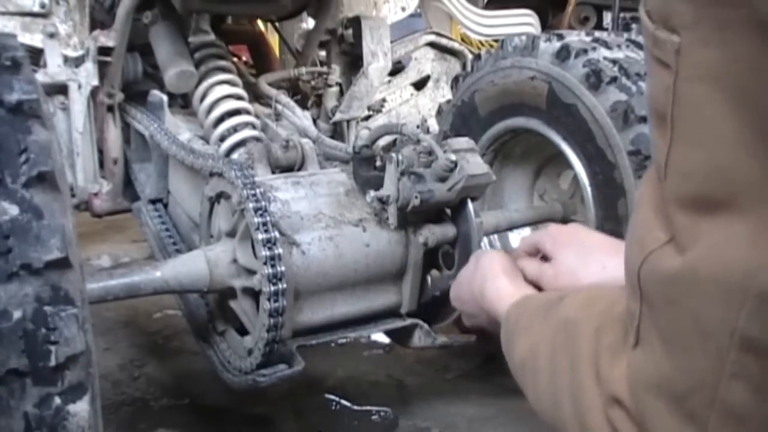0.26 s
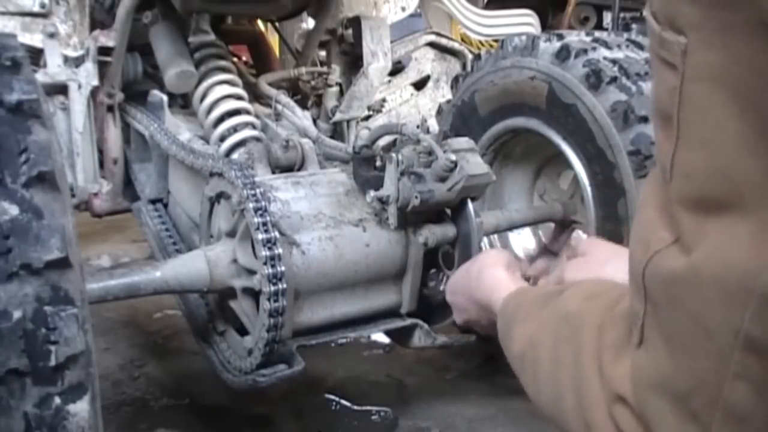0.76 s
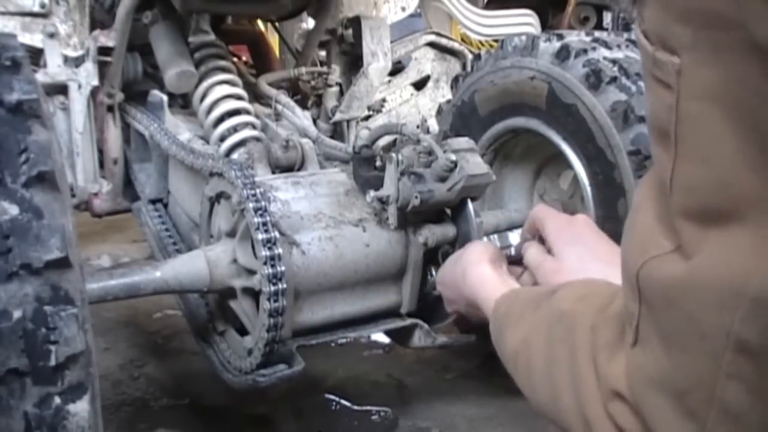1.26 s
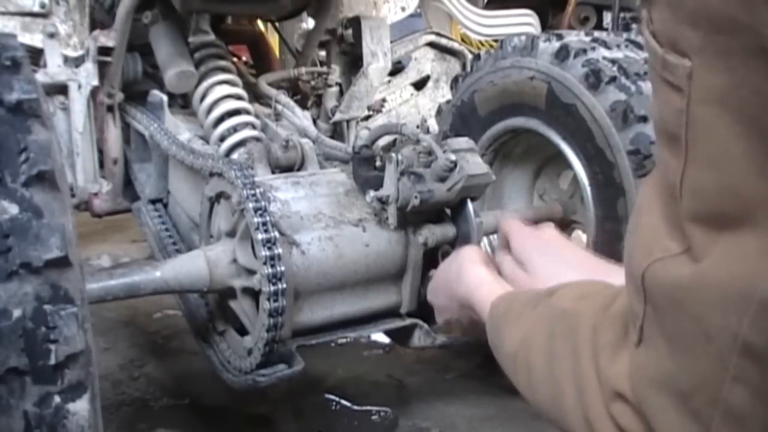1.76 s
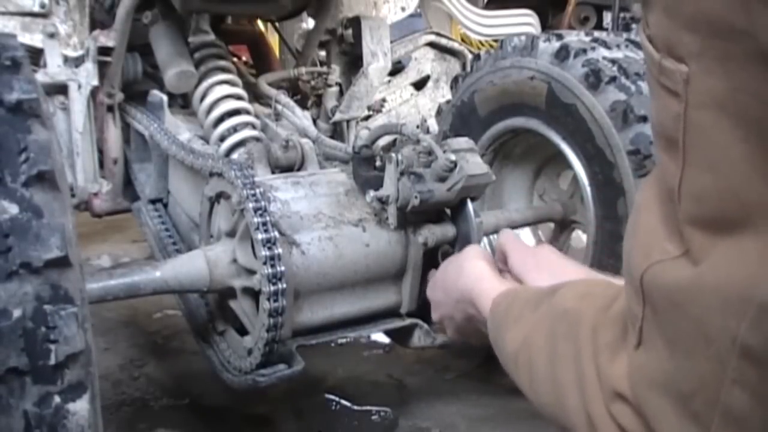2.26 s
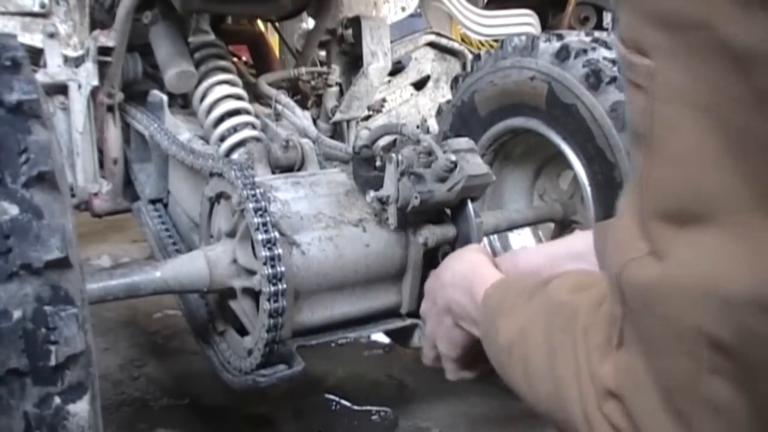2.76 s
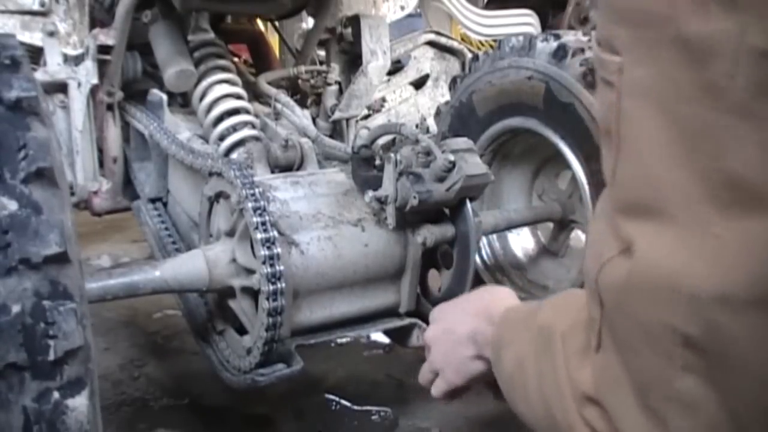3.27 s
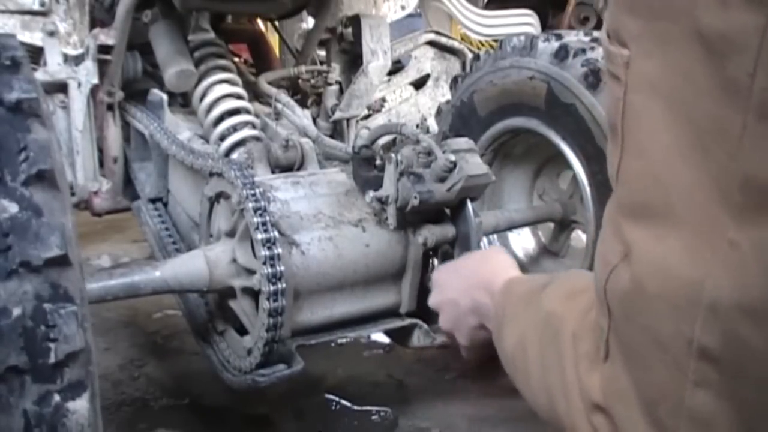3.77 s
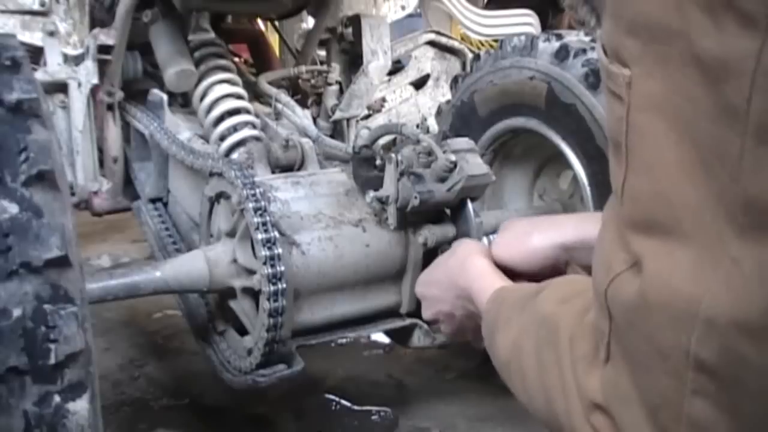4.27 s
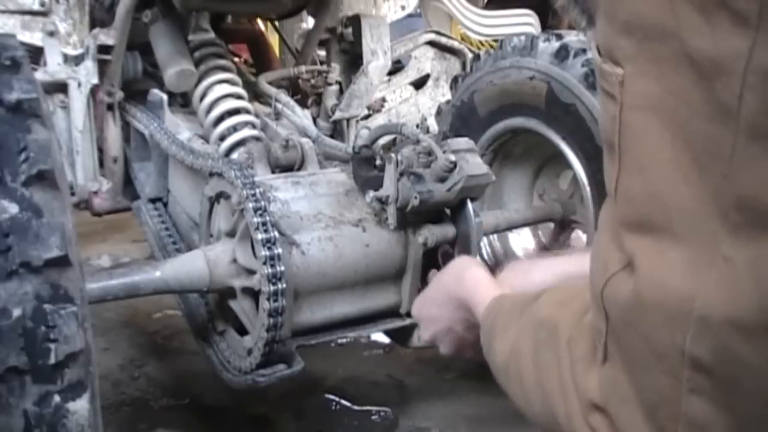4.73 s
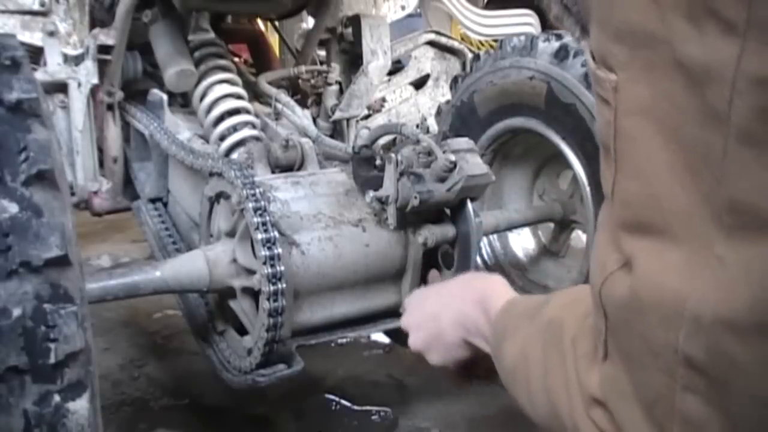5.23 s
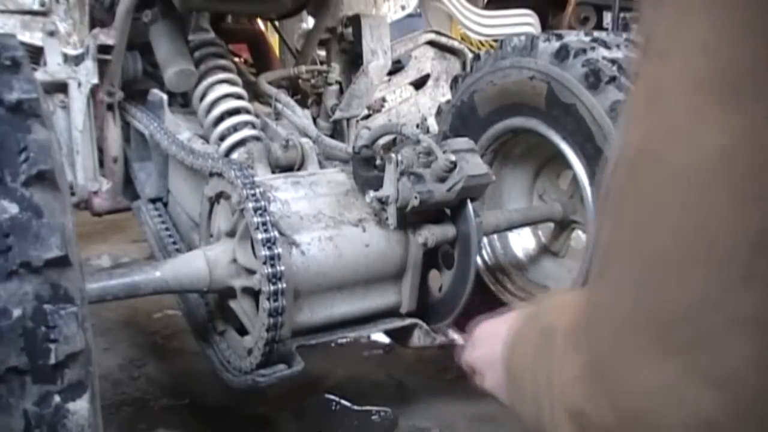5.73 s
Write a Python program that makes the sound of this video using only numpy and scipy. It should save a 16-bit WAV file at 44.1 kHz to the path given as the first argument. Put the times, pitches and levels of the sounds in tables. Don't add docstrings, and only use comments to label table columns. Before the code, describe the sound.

Hands unscrew a bolt: sharp knocks, quick clicks, small jingles and two parts set down with a clank, over cloth rustle and faint hiss.

```python
import sys
import numpy as np
from scipy import signal
from scipy.fft import rfft, irfft
from scipy.io import wavfile
from scipy.ndimage import uniform_filter1d

SR = 44100
rng = np.random.default_rng(int(sys.argv[2]) if len(sys.argv) > 2 else 0)


def field_ratio(decibels):
    return 10 ** (np.asarray(decibels, dtype=float) / 20)


def generate_wav(sig):
    pcm = np.round(np.clip(np.atleast_2d(sig).T, -1, 1) * 32767).astype(np.int16)
    wavfile.write(sys.argv[1], SR, pcm)


N = 264600
SIZE = 8192
ROD_S = .7085

# pitch_hz, level_db, t60_s
FRAME_BODY = [(293, -11, 0.016), (530, -6, 0.005), (561.5, -8, 0.02), (622, -7, 0.025), (729, 0, 0.016)]
FRAME = [(896, -5, 0.032), (900, -6, 0.03), (1108, -2, 0.019), (1274, 0.5, 0.019), (1418, 4.5, 0.011),
         (1500, 4, 0.013), (1588, -1, 0.015), (1766, -10, 0.011)]
BRACKET = [(1975, 2.5, 0.0069), (2274, -1, 0.014), (2430, -3, 0.013), (2840, -2, 0.023),
           (3240, -0.5, 0.0056), (3460, -5, 0.022), (3900, 6, 0.0052), (3920, 3, 0.015),
           (4560, -7.5, 0.0029), (4740, -13, 0.0028)]
STEEL = [(5200, 11.5, 0.00068), (6270, 8.5, 0.002), (7620, 7, 0.0022), (8300, -7.5, 0.012),
         (8680, -2.5, 0.0071)]
STEEL_GLINT = [(9550, 8, 0.002), (10950, -19, 0.0048), (11200, -38, 0.0016), (11570, 3, 0.0023),
               (13000, -7, 0.0042)]
# pitch_hz, level_db, t60_s
ROD_TAP = [
    [(4550, 0.5, 0.0078), (5860, -5.5, 0.014), (6450, -1, 0.0073), (7430, -1, 0.013), (8360, -6, .01)],
    [(9200, -3, 0.0067), (10300, 1, .01), (11600, 1, .008), (12600, -8, 0.007)],
    [(1120, -9, .015), (1600, 0, 0.0076), (2000, -3.5, 0.021), (2540, 1, .01), (3260, 1.5, 0.014), (3700, -1, .01)],
]


def unit(x):
    return x / np.sqrt(np.mean(x ** 2))


def band(x, lo_hz, hi_hz):
    edges_hz = [lo_hz, min(hi_hz, .45 * SR)]
    return signal.sosfilt(signal.butter(2, edges_hz, "bandpass", fs=SR, output="sos"), x)


def ring(modes, strength, size=SIZE, slower=1):
    hz, db, t60 = np.transpose(modes)[:, :, None]
    t = np.arange(size) / SR
    level = strength[:len(modes), None] * field_ratio(db)
    decay = 1000. ** (-t / (slower * t60))
    return np.sum(level * np.sin(2 * np.pi * hz * t) * decay, axis=0)


def add(out, s, sound):
    i = int(s * SR)
    out[i:i + len(sound)] += sound[:N - i]


def walk(rate, size=N):
    k = int(SR / rate)
    held = np.repeat(rng.standard_normal(size // k + 1), k)
    return 1.2 * uniform_filter1d(held, k)[:size]


def tones(rows, width, edge, flicker_db, rate):
    out = np.zeros(N)
    for start, end, hz, db in rows:
        t = np.arange(int((end - start) * SR)) / SR
        gate = np.clip(np.minimum(t, end - start - t) / (edge * (end - start)), 0, 1)
        phase = 2 * np.pi * np.cumsum(hz * (1 + width * walk(rate, len(t)))) / SR
        level = np.sqrt(2) * field_ratio(db + flicker_db * walk(rate, len(t)))
        add(out, start, level * gate * np.sin(phase))
    return out


def contact(part_db, parts, length, rise, lead, grit_db, spot_db, rattle, fine=0, panels=None):
    size = 2 * SIZE if rattle else SIZE // 2
    t = np.arange(size) / SR
    chance = rng.standard_normal((3, size))
    grit = chance[0] * field_ratio(grit_db * chance[1])
    rising = np.clip((t + 1e-4) / (rise * length + 1e-4), 0, 1)
    chatter = (rising * np.exp(-t / length) * grit)[:SIZE // 2]
    chatter[int(.0009 * SR) if rattle else 0] += lead
    sound = np.zeros(2 * SIZE)
    for k, modes in enumerate(parts):
        sign = (-1.) ** (np.arange(16) + sum(map(len, parts[:k])))
        strength = field_ratio(spot_db * chance[2, 16 * k:16 * k + 16]) * sign
        blow = signal.fftconvolve(chatter, ring(modes, strength, size=SIZE // 4))
        peak = np.sqrt(2 * uniform_filter1d(blow ** 2, size=128).max())
        sound[:len(blow)] += blow * field_ratio(part_db[k]) / peak
        if rattle:
            under_db, t60 = rattle[k]
            panel = ring(panels[k], strength, size=SIZE // 4, slower=.5)
            panel = panel + fine * ring(panels[k], strength, size=SIZE // 4, slower=3.5)
            shaking = np.roll(chance[2], k * SIZE // 2)
            shaken = unit(signal.fftconvolve(shaking, panel)[:2 * SIZE]) * np.clip(t / 0.0055, 0, 1)
            dull = uniform_filter1d(shaken, size=7)
            shaken = dull + (shaken - dull) * 1000. ** (-t / .3)
            sound += field_ratio(part_db[k] - 4.0 + under_db) * shaken * 1000. ** (-t / t60)
    return sound


def knocks(table, boom, thud, clack, length, rattle, fine=.3, glints=5, panels=None):
    def near(modes, db_per_octave):
        return [(hz, db - db_per_octave * abs(np.log2(hz / spot_hz)), t60) for hz, db, t60 in modes]

    out = np.zeros(N)
    steel = STEEL + STEEL_GLINT[:glints]
    low, mid, high = panels or (boom, thud, clack)
    for s, db, weight, hard, spot_hz in table:
        part_db = (db + weight, db, db + 5 + .62 * hard, db + hard)
        parts = (boom, near(thud, 5), near(clack, 8), steel)
        ringing = (low, near(mid, 5), near(high, 8), steel[1:])
        add(out, s, contact(part_db, parts, length, .3, 45, 8.9, 2.4, rattle, fine, ringing))
    return out


def contacts(table, thud_db, rise, lead, grit_db):
    # pitch_hz, level_db, t60_s
    free_s = (1.78, 2.34)
    shank = [(4720, -9.5, 0.0071), (5310, -10, 0.0091), (6040, -9.5, .008), (6800, -8, .004),
             (7840, 0, 0.012), (8860, -5, .01)], [(9330, -1.5, 0.0054), (10440, -2, 0.0045), (11360, 2.5, 0.0067),
                                 (12200, 0, 0.006), (12900, 2, 0.0037)], [(2140, -2, 0.0048), (2520, 0, 0.0058),
                                                      (2815, 0, 0.014), (3400, 0, 0.0037),
                                                      (3900, -6, 0.0042)]
    # pitch_hz, level_db, t60_s
    loose_s = [
        (.2, .66),
        (4.18, 4.85),
    ]
    loose = [
        [(5430, -6, .005), (6450, -4, 0.0084), (7300, -4, .006), (8160, 1.5, 0.011), (9060, -3, .012)],
        [(10100, 0, .006), (11450, -1, 0.011), (12600, -5, .008)],
    ]
    # pitch_hz, level_db, t60_s
    palm_s = (3.14, 3.33)
    palm = [
        [(7340, -1, 0.014), (8530, 6, 0.014), (8700, -7, .015), (9300, -3, .012)],
        [(10100, -6, .012), (10700, 0, 0.011), (12100, 0, .012)],
        [(4400, -1, .015), (5750, -2, 0.013)],
    ]
    out = np.zeros(N)
    for s, db, sharp, depth, *length in table:
        high, glint, low = STEEL, STEEL_GLINT, BRACKET
        if free_s[0] < s < free_s[1]:
            high, glint, low = shank
        if any(a < s < b for a, b in loose_s):
            high, glint = loose
        if palm_s[0] < s < palm_s[1]:
            high, glint, low = palm
        if abs(s - ROD_S) < .005:
            high, glint, low = ROD_TAP
            length = [.0068]
        part_db = (db, db + sharp, db + depth, db + thud_db + 1.48 * depth)
        parts = (high, glint, low, FRAME_BODY[1:] + FRAME)
        length_s = length[0] if length else .0076
        add(out, s, contact(part_db, parts, length_s, rise, lead, grit_db, 2.5, None))
    return out


def air():
    # pitch_hz, level_db (per Hz)
    spectrum = [(20, -25), (65, 3.5), (236, 6.5), (928, 1.5), (1480, -3), (2560, -6), (5360, -10),
                (11200, -7.5)]
    hz, db = np.transpose(spectrum)
    f = np.arange(N // 2 + 1) * SR / N + 1
    colour = field_ratio(np.interp(np.log(f), np.log(hz), db))
    return field_ratio(-53) * unit(irfft(rfft(rng.standard_normal(N)) * colour, N))


def sleeve():
    # start_s, length_s, level_db, weight_db
    strokes = [(-.1, 0.16, -57.5, -39), (0.425, 0.41, -58.5, -16), (0.716, 0.12, -60.5, 10),
               (1.011, 0.2, -51, -74), (1.445, 0.13, -50, -27), (1.82, 0.22, -46.5, -13),
               (2.047, 0.056, -49.5, -8), (2.123, 0.16, -41.5, -39), (2.207, 0.17, -51, 9),
               (2.49, 0.12, -47.5, -19), (2.571, 0.22, -47, -20), (2.72, 0.44, -48.5, -4),
               (3.187, 0.45, -51.5, -23), (3.44, 0.32, -52.5, 6.5), (4.02, 0.79, -57.5, 1.5),
               (4.657, 0.2, -57.5, 5), (4.96, 0.3, -50.5, -3), (5.177, 0.33, -54.5, 2),
               (5.481, 0.15, -70.5, 22.5), (5.623, 0.13, -52.5, 11.5), (5.714, 0.29, -45, -4.5),
               (5.837, 0.14, -37, -8), (5.916, 0.18, -39, -1)]
    # low_hz, high_hz
    weave = [
        (5500, 13500),
        (1750, 5500),
        (450, 1750),
    ]
    rest_db = (-65, -90, -62)
    t = np.arange(0, N, 64) / SR
    effort = np.outer(field_ratio(np.array(rest_db)) ** 2, np.ones(len(t)))
    for s, length, db, weight in strokes:
        gate = np.clip(np.minimum(t - s, s + length - t) / (.28 * length), 0, 1)
        region_db = db + np.array([0, -6 + .25 * weight, weight])
        effort = effort + np.outer(field_ratio(region_db), gate) ** 2
    grains = rng.standard_normal(N) * field_ratio(2.9 * rng.standard_normal(N))
    out, drag = 0, .8 * walk(30)
    for (lo_hz, hi_hz), power in zip(weave, effort):
        flicker = field_ratio(drag + .7 * walk(60))
        level = np.interp(np.arange(N) / SR, t, np.sqrt(power))
        out = out + unit(band(np.roll(grains, lo_hz), lo_hz, hi_hz)) * level * flicker
    return out


def washer():
    # start_s, length_s, pitch_hz, level_db
    songs = [(.52, .03, 6350, -61), (.57, .02, 6350, -57), (.615, .05, 6350, -60), (.56, .04, 12600, -59),
             (.6, .07, 11400, -66), (1.08, .08, 6350, -68), (2.86, .12, 1600, -57), (1.4, .1, 7250, -60),
             (1.41, .09, 10650, -61), (4.28, .09, 2890, -50), (4.28, .07, 3150, -54),
             (4.36, .07, 2890, -60), (4.19, .06, 9200, -60), (.338, .04, 9200, -54),
             (1.497, .05, 9200, -52), (1.135, .015, 6350, -52), (.135, .02, 9300, -60),
             (5.258, .025, 9600, -50), (1.41, .09, 8800, -67), (4.55, .1, 8050, -61),
             (4.84, .07, 6400, -66), (4.84, .07, 8100, -68)]
    rows = [(s, s + length, hz, db) for s, length, hz, db in songs]
    return tones(rows, width=.004, edge=.3, flicker_db=5, rate=150)


def frame_knocks():
    # start_s, force_db, weight_db, hardness_db, struck_spot_hz
    blows = [(0.139, -56, 19, 11, 3900), (0.298, -16, -0.5, -3.5, 1900), (0.34, -32, -4, 6, 2220),
             (0.498, -33.5, -3.5, -7.5, 1870), (1.076, -32, 3, -10, 2800), (1.118, -25, 0.5, -22, 1590),
             (1.1403, -24.5, -1.5, -16.5, 1500), (1.498, -28.5, -11, 2, 3700),
             (1.506, -18, -2.5, -10, 2000), (1.538, -29.5, 3, -5.5, 2780), (1.7955, -36, 0, -19, 1500),
             (2.1058, -25, -5, -21, 1500), (2.357, -11.5, -6.5, -5.5, 2880), (2.848, -60, 3, 4, 1900),
             (3.486, -46.5, 15, 12, 1920), (3.882, -43, 5.5, -29, 1850), (4.28, -25.5, 1, -4, 3040),
             (4.705, -23.5, 3, -14.5, 1600)]
    # level_db (relative to the blow), t60_s
    rattle = [
        (-12.5, 0.32),
        (-9, 0.37),
        (-10.5, 0.35),
        (5.5, 0.04),
    ]
    # pitch_hz, level_db, t60_s
    panels = [(300, -28, 0.0087), (568, -9.5, 0.0073), (690, -2.5, 0.026), (729, -4.5, 0.017)], [(850, -12.5, 0.02), (1007, -1.5, 0.0091), (1122, 3, 0.011),
                                 (1400, -4.5, 0.019), (1600, -0.5, 0.0088)], [(1960, 0, .013), (2250, -3, .012), (2470, 0, .012),
                                                    (2800, 0, .012), (3200, -1, .014), (3560, -4, .012),
                                                    (3900, -4, .014), (4200, -13, .012)]
    return knocks(blows, FRAME_BODY, FRAME, BRACKET, .0032, rattle, panels=panels)


def walls(x):
    # pitch_hz, t60_s, level_db
    bands = [(358, 0.19, -12), (700, 0.41, -10), (1330, 1, -29.5), (2800, 0.66, -18.5), (5200, 0.38, -19),
             (11900, 0.41, -19)]
    t = np.arange(SR // 2) / SR
    onset = np.clip((t - .004) / 0.0013, 0, 1)
    echo = 0
    for hz, t60, db in bands:
        noise = band(rng.standard_normal(len(t)), hz / 1.31, hz * 1.39)
        tail = noise * onset * 1000. ** (-t / t60)
        echo = echo + field_ratio(db) * tail / np.sqrt(np.sum(tail ** 2)) * np.sqrt(hz / SR)
    return 3.49 * signal.fftconvolve(x, echo)[:N]


def thread_ticks():
    # start_s, force_db, sharpness_db, depth_db (into the mount)
    ticks = [(0.2568, -53, -9, -17), (0.575, -60, 15, 10), (0.708, -21, -6.5, -1), (0.822, -49, 2, -11),
             (1.6226, -35.5, 2.5, -7), (1.6706, -33, 3, -10), (1.691, -37, 2, -40), (1.71, -46, -8, -16),
             (2.5637, -23.5, 1, -16), (3.0155, -24.5, 2, -14), (3.1536, -37, -4, -10), (3.228, -39, -3, -4),
             (3.5084, -43, 7, 1), (3.924, -46.5, -1.5, -8), (4.0587, -47.5, 0, -18),
             (4.167, -35.5, 5.5, -4), (4.1874, -36.5, -7, -8.5), (4.2298, -40.5, -4, -13),
             (4.413, -48.5, 1, -12), (4.5461, -34.5, -10, -9.5), (4.769, -35, 1, -24),
             (4.811, -50, -2.5, -14), (5.04, -53.5, 15, -19), (5.3346, -25.5, 4, -9.5)]
    spins = [
        (1.854, -30.5, 0.5, -4),
        (1.884, -38, 0, -4.5),
        (1.9083, -24.5, 1, -7.5),
        (1.9191, -28.5, 0, -7),
        (1.9386, -28.5, 0, -6),
        (1.947, -28, 2, -8),
        (1.995, -43, 0, 0),
        (2.0097, -35, 2.5, -7),
        (2.02, -38.5, -10, -1.5),
        (2.142, -38, -7, -6),
    ]
    return contacts(ticks + spins, -6.5, rise=0.24, lead=3.3, grit_db=-2.5)


def engines():
    # start_s, end_s, pitch_hz, level_db
    drones = [
        (0.28, .75, 122, -60.5),
        (.7, 1.6, 120, -66.5),
        (1.81, 2.154, 119.7, -61.5),
        (0.58, 2.16, 74.1, -72),
        (4.5, 5.1, 75.3, -71),
        (5.55, 6.2, 111.1, -63),
    ]
    return tones(drones, width=0.027, edge=0.096, flicker_db=-1.5, rate=9.8)


def thread_nudges():
    # start_s, force_db, sharpness_db, depth_db
    nudges = [(4.34, -49, -1, -14), (4.478, -53, -9, -16), (4.532, -60, -8, -14), (4.578, -44, -6, -11),
              (4.603, -44.5, -7, -12), (4.645, -52, -4, -16), (4.692, -50, 3, -18), (.647, -56, 2, -12),
              (1.165, -49, 2, -16), (5.132, -39, 4, -4), (5.155, -43, 6, -12), (5.184, -43, 2, -10),
              (5.3, -44, 0, -2), (5.4, -50, 0, -14)]
    return contacts(nudges, -6.5, rise=.1, lead=3, grit_db=1)


def rod():
    # pitch_hz, level_db, t60_s
    modes = [(2433, -8, .35), (3252, -4, .4), (3300, -3, .05), (3688, -8, .3), (4474, -7, .22),
             (4750, -3, .03), (5722, -2, .3), (5815, 1, .35), (6535, -4, .42), (7267, -1, .13),
             (8500, -6, .08), (10570, -5, .17), (11490, -9, .15), (12340, -5, .16)]
    out, t = np.zeros(N), np.arange(SIZE // 2) / SR
    chatter = (t == 0) + .012 * rng.standard_normal(len(t)) * np.exp(-t / .03)
    chatter[int(.042 * SR)] += .3
    add(out, ROD_S, field_ratio(-38) * signal.fftconvolve(chatter, ring(modes, np.ones(len(modes)))))
    clamp = sum(ROD_TAP, [])
    clamp_ring = ring(clamp, np.ones(len(clamp)), size=SIZE // 8)
    rattle = unit(signal.fftconvolve(rng.standard_normal(SIZE), clamp_ring)[:SIZE])
    add(out, ROD_S, field_ratio(-50) * rattle * 1000. ** (-np.arange(SIZE) / SR / .2))
    return out


def bumps():
    # start_s, level_db, pitch_hz, t60_s
    knuckles = [
        (.715, -47, 300, 0.11),
        (0.744, -45, 220, 0.092),
        (0.791, -51, 187, 0.074),
        (2.256, -40, 248, .08),
        (2.845, -41.5, 224, 0.065),
        (3.487, -44, 290, .05),
        (5.19, -47.5, 250, .07),
        (5.982, -38.5, 271, 0.053),
    ]
    out, onset = np.zeros(N), np.clip(np.arange(SIZE) / SR / .0013, 0, 1)
    for s, db, hz, t60 in knuckles:
        modes = [(hz, db, t60), (hz * 2.08, db + 2, t60)]
        add(out, s, onset * ring(modes, np.ones(2)))
    return out


def thread_scrapes():
    # start_s, force_db, sharpness_db, depth_db, length_s
    scrapes = [(2.1994, -42, 10, 1.5, 0.004), (2.2236, -29.5, 2, 0.5, 0.019), (2.2494, -33, 8, 5, 0.0061),
               (2.321, -30.5, 0.5, -13, 0.019), (2.9682, -49, 14, -16, 0.017),
               (3.2946, -41.5, 0, -14, 0.045), (3.352, -56, 17.5, -6, 0.022),
               (3.5343, -27.5, 1, -1.5, 0.032), (3.592, -39.5, -4, 8, 0.03),
               (3.6038, -24, -0.2, -2.5, 0.011), (3.714, -46, 5, -19, 0.027),
               (4.732, -42, -0.5, -19, 0.023), (5.115, -40.5, 2, -6, 0.01), (5.15, -50, 5, 5, 0.041),
               (5.261, -35.5, 3.5, 0.5, 0.017), (5.2965, -48, -6, 7.5, 0.013),
               (1.7899, -34.5, -2.5, -7.5, 0.0069),
        (1.9265, -37, 2, 0, 0.0043),
        (1.954, -38, -2, 1, 0.0034),
        (2.003, -37, 5, -12, 0.0054),
        (2.1032, -34.5, -0.5, -13, 0.0036),
        (2.165, -43, 8, 2, .008),
        (2.178, -40, 4, -3, 0.0039),
        (2.189, -43, 2, -4, .004),
        (2.239, -30, -2, -8, 0.0064),
    ]
    return contacts(scrapes, -4, rise=.4, lead=0, grit_db=3.5)


def tray_drops():
    # start_s, force_db, weight_db, hardness_db, struck_spot_hz
    drops = [
        (3.0592, -10.5, -4, -10, 2110),
    ]
    late_tail = [
        (5.511, -39, 0.008, -14, 2300),
    ]
    # pitch_hz, level_db, t60_s
    tray, rim = [(299, -8, 0.16), (478, -7.5, 0.04), (548, -4.5, 0.037), (613, -2, 0.022),
                 (780, -3.5, 0.017)], [(865, 5, 0.009), (1020, 5.5, 0.017), (1066, 2.5, 0.027), (1358, 4.5, 0.016),
                               (1495, -4, 0.0058), (1614, -9.5, 0.024)]
    edge, side = [(1896, -3, 0.022), (2070, -6, 0.013), (2300, -1, 0.014), (2370, 0.5, 0.009),
                  (2730, -10, 0.005), (2900, -13, 0.0091), (3160, 2, 0.0084), (3480, -5, 0.013),
                  (3700, -2, 0.0038), (4360, -15, 0.0063)], [(1950, 0, .01), (2200, -2, .008), (2560, -5, .008), (2800, -7, .008),
                                     (3170, -8, .008), (3700, -12, .007), (4070, -13, .007),
                                     (4530, -14, .006), (5230, -16, .006)]
    # level_db (relative to the blow), t60_s
    rattle = [
        (-8, 0.39),
        (-7, 0.28),
        (-12, 0.29),
        (-17, 0.31),
    ]
    loose = [(db + 10.5, t60) for db, t60 in rattle]
    out = knocks(drops, tray, rim, edge, .004, rattle, fine=.08, glints=1, panels=(tray, rim, side))
    return out + knocks(late_tail, tray, rim, BRACKET, 0.0028, loose)


def bolt():
    # pitch_hz, width_hz, level_db
    resonances = [(4460, 33, -9), (5750, 35, -2), (7190, 32, -1), (8340, 110, 3), (8760, 28, -3),
                  (9160, 100, -2), (10100, 38, -3), (10500, 54, -7), (12300, 27, -5), (13000, 33, -9)]
    # start_s, length_s, level_db
    jingle = [
        (3.15, .2, -48),
        (3.44, .12, -52),
        (3.74, .08, -57),
    ]
    # start_s, strength (ratio)
    touches = [
        (3.159, 1.1),
        (3.178, 2.4),
        (3.209, .6),
        (3.23, 1.7),
        (3.262, 0.75),
        (3.3, 2.5),
        (3.325, 0.78),
        (3.46, 1),
        (3.51, 1.1),
        (3.76, 2.3),
    ]
    t, shakes = np.arange(N) / SR, 0
    for s, length, db in jingle:
        gate = np.clip(np.minimum((t - s) / .015, (s + length - t) / .02), 0, 1)
        shakes = shakes + gate * field_ratio(db - 20 * np.maximum(t - s, 0))
    taps = .035 * rng.standard_normal(N)
    for s, strength in touches:
        add(taps, s, strength * rng.standard_normal(size=24) / 5)
    modes = [(hz, db, 3.8 / width) for hz, width, db in resonances]
    return shakes * unit(signal.fftconvolve(taps, ring(modes, np.ones(len(modes))))[:N])


def nut_drop():
    # start_s, force_db, weight_db, hardness_db, struck_spot_hz
    drop = [
        (5.6395, -13.5, -14.5, -15.5, 1900),
    ]
    # pitch_hz, level_db, t60_s
    low, mid, high = [(317, -1, 0.036), (455, -1, 0.064), (714, -7, 0.046)], [(860, -12, 0.021), (993, -1, 0.024), (1115, -1, 0.02),
                                       (1268, -1, 0.027), (1500, -2.5, 0.011), (1640, -7, 0.008)], [(1990, -1, 0.036), (2720, 5, 0.0042),
                                                        (2930, 1, 0.022), (3400, 2.5, 0.0046),
                                                        (4020, -2.5, 0.021), (4400, -4, 0.0078),
                                                        (5260, -7, 0.0068)]
    rattle = [
        (-0.5, 0.27),
        (-10, 0.24),
        (-14.5, 0.3),
        (-1, 0.086),
    ]
    return knocks(drop, low, mid, high, .004, rattle, fine=.15)


def button_drags():
    # start_s, force_db, sharpness_db, depth_db, length_s
    drags = [
        (5.875, -46, 3, 10, 0.032),
        (5.915, -48.5, -6, 11.6, 0.017),
        (5.948, -48, -6, 7, 0.024),
    ]
    return contacts(drags, -4, rise=.4, lead=0, grit_db=3.5)


def scene():
    metal = frame_knocks() + thread_ticks() + thread_nudges() + rod() + thread_scrapes()
    metal = metal + tray_drops() + bolt() + nut_drop() + button_drags()
    for low_hz in (300, 280, 190):
        metal = band(metal, low_hz, 20000)
    return (metal + walls(metal) + washer() + bumps() + sleeve() + engines() + air())[None]


def top_cut(x):
    return signal.sosfilt(signal.butter(12, 14900, fs=SR, output="sos"), x)


def record(dry):
    gap_s, gap_length_s, top_hz = 5.507, 0.0047, 13600
    gate = np.clip(np.abs(np.arange(N) / SR - gap_s) / gap_length_s, .1, 1)
    cut = signal.sosfilt(signal.ellip(10, .2, 48, top_hz, fs=SR, output="sos"), dry * gate)
    mix = signal.sosfilt(signal.butter(1, 30, "highpass", fs=SR, output="sos"), cut)
    return top_cut(mix)


dry = scene()
out = record(dry)
generate_wav(out)
```